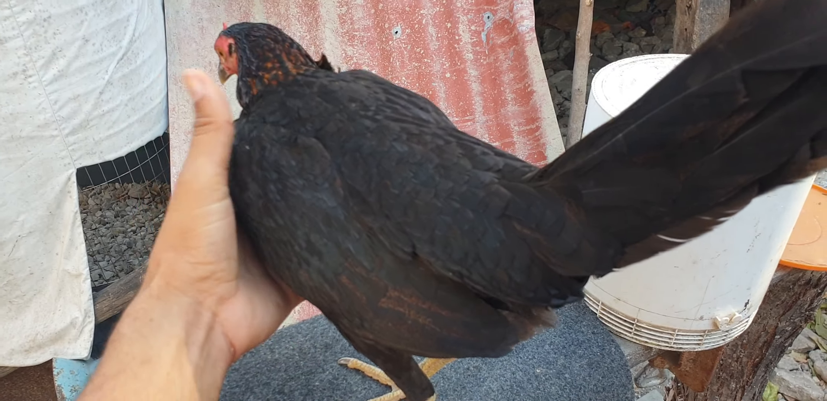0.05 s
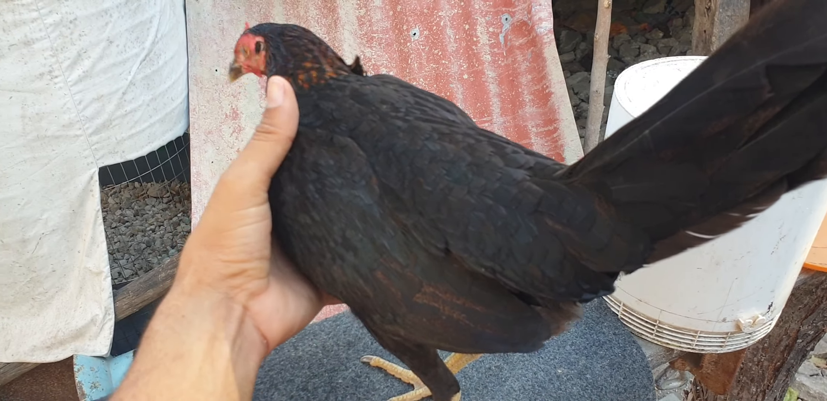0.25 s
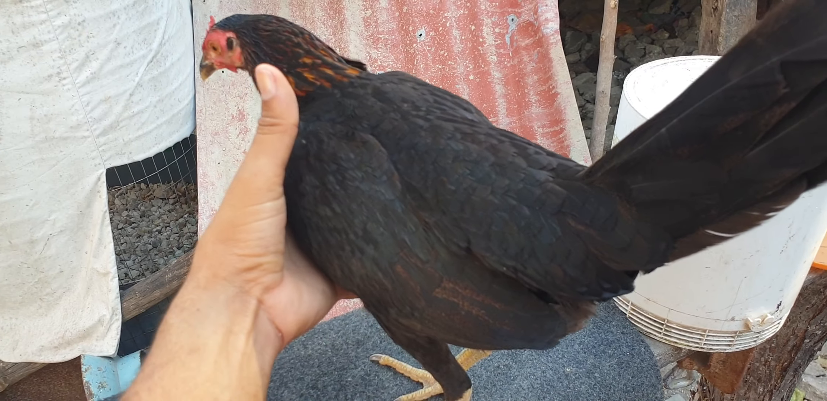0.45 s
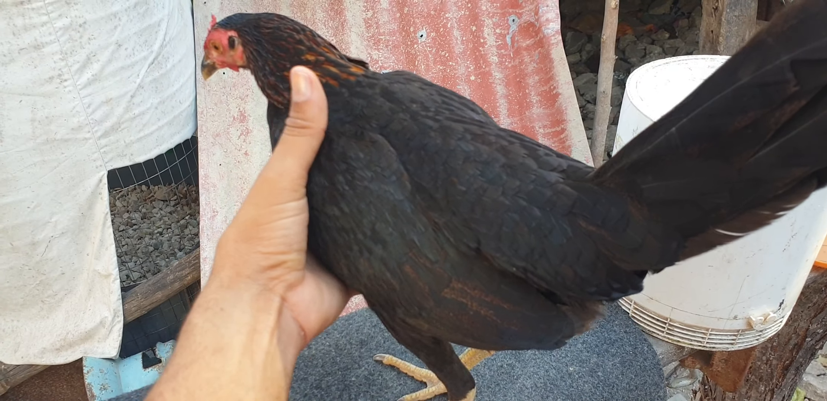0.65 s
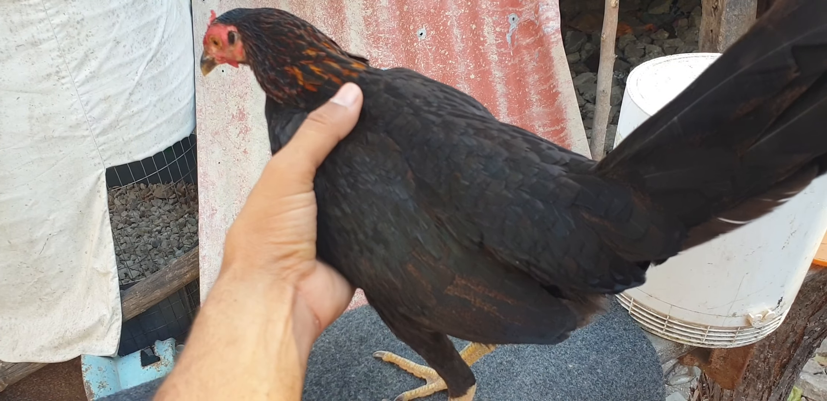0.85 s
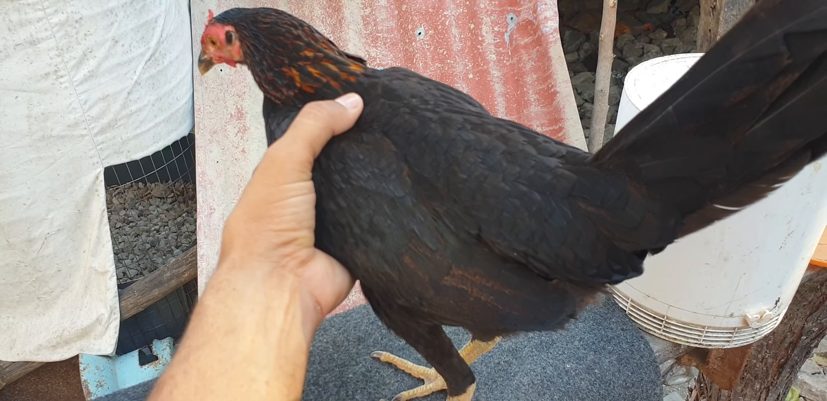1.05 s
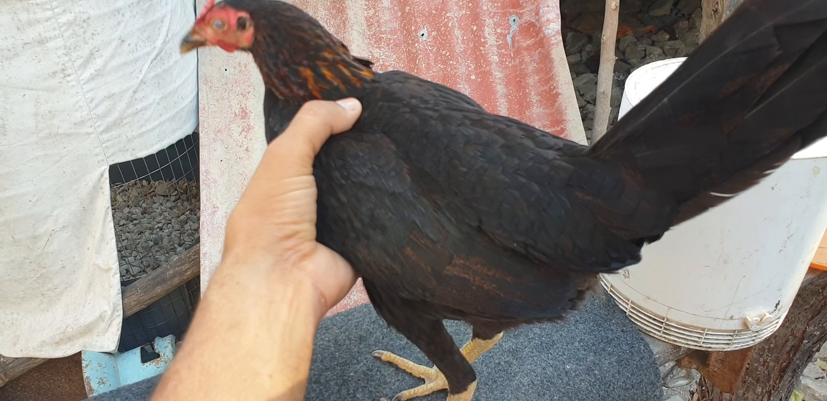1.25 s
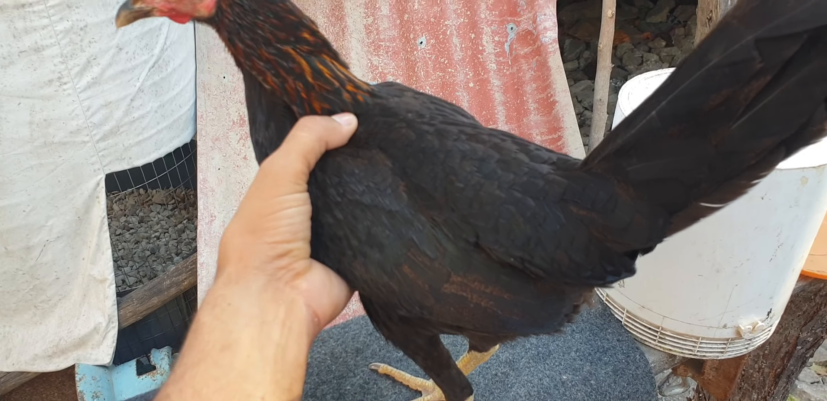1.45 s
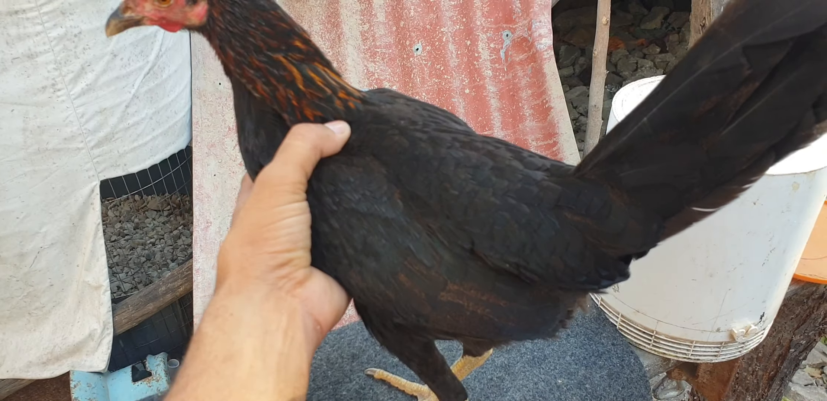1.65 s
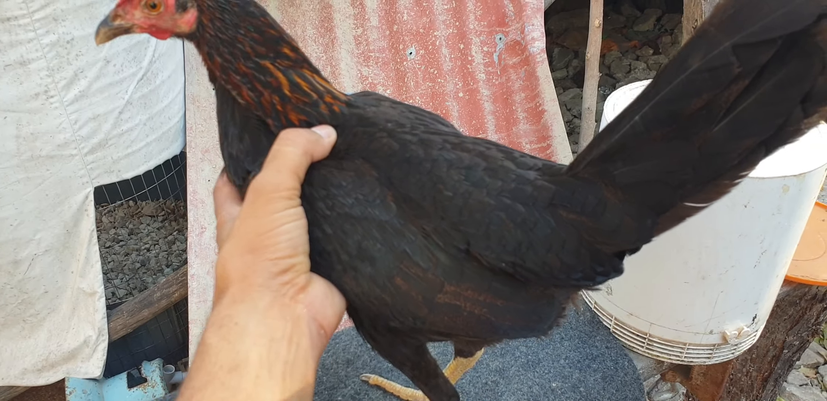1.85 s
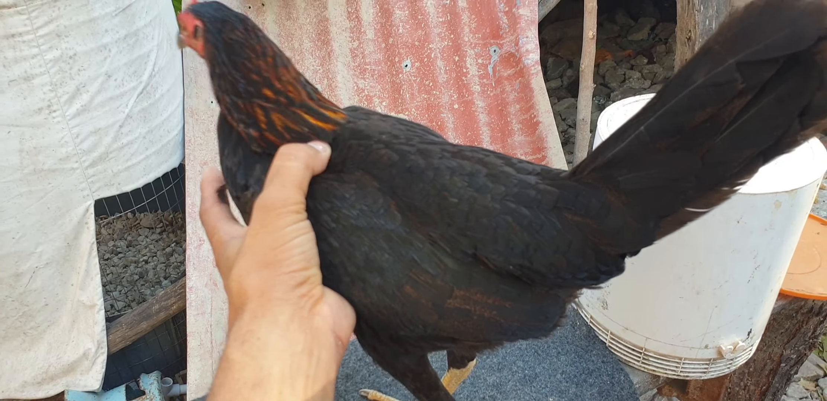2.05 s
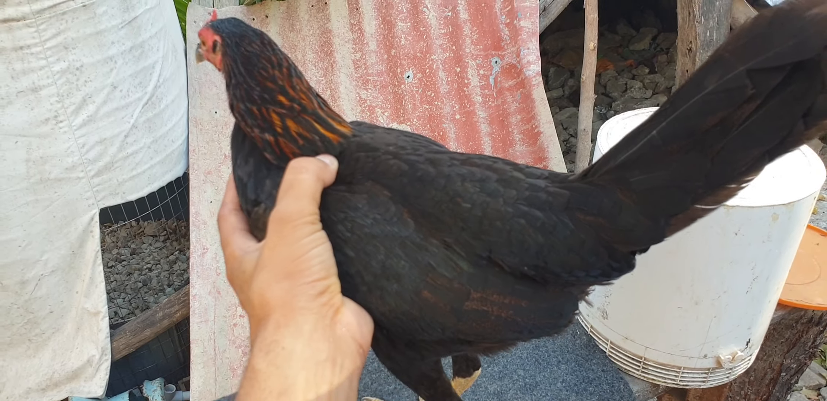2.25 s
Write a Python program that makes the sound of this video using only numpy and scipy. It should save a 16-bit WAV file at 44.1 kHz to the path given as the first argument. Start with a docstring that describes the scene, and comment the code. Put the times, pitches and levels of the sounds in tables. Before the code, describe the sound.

A hen calls close to the microphone in four drawn-out notes, flipping between a clear tone and a hoarse rattle. Three run from 0.2 to 1 second, with thin wheezes and a soft hand bump near 0.6. The fourth starts at 1.2 and cracks into a croak around 1.55. From 1.8 to 2.4 seconds come faint clucks and a light feather rustle, over quiet yard noise.

```python
"""A quiet yard, where a hen, held and stroked close to the microphone, complains in four drawn-out notes.
Her voice flips between a clean tone near 1 kHz and a hoarse rattle of membranes slapping in her throat.
A thin wheeze of air slips between the notes, and the last one cracks into a croak.
The hand adds a soft bump, faint clucks and a feather rustle trail off, and the yard gives a short echo."""
import sys
import numpy as np
from scipy import signal
from scipy.fft import rfft, irfft
from scipy.io import wavfile
from scipy.ndimage import uniform_filter1d

SR = 44100
rng = np.random.default_rng(int(sys.argv[2]) if len(sys.argv) > 2 else 0)


def put_to_file(sound):
    """Save the sound as 16-bit audio at rate SR, in the file named by the first command-line argument."""
    columns = np.atleast_2d(sound).T  # one column per channel
    safe = np.clip(columns, -1, 1)
    whole_steps = np.round(safe * 32767)
    wavfile.write(sys.argv[1], SR, whole_steps.astype(np.int16))


N = 105840
T = np.arange(N) / SR

# colour of the outdoor bed (frequency [Hz], gain [dB])
YARD_EQ = [(25, -20.5), (65, -5.5), (125, -13.5), (210, -15.5), (255, -10), (320, -20), (460, -9.5),
           (600, -20), (950, -21), (1400, -31), (2200, -26.5), (4000, -46), (6200, -40), (8200, -56),
           (15000, -47.5)]
# its slow swell (time [s], level [dB])
YARD_LEVEL = [(0, -63.5), (1.3, -57.5), (2.0, -59.5), (2.4, -62.5)]
# envelope of the hoarse voice (time [s], level [dB])
RASP_LEVEL = [(.18, -81), (.188, -36.5), (.207, -31.5), (.24, -28.5), (.262, -38), (.31, -50.5),
              (.332, -30.5), (.37, -32.5), (.398, -27), (.43, -35.5), (.48, -50.5), (.505, -27),
              (.522, -31.5), (.545, -53), (.602, -59), (.622, -28.5), (.655, -33), (.68, -30), (.75, -33),
              (.78, -48), (.806, -54), (.822, -32), (.86, -32.5), (.892, -40), (.945, -28), (1.0, -26),
              (1.045, -37.5), (1.085, -59), (1.13, -61), (1.175, -30), (1.228, -27.5), (1.255, -41.5),
              (1.34, -59.5), (1.54, -45)]
# throat resonances (frequency [Hz], width [Hz], gain [dB])
THROAT = [(464, 180, -23.5), (791.6, 175, 5), (1137, 583, -3), (2080, 563, 6), (2332, 510, 5),
          (2757, 300, 0.5), (3505, 430, -4.5), (3923, 500, -5), (5050, 650, -12), (6352, 510, -11.5),
          (11600, 6000, -40)]
# one envelope table per note (time [s], fundamental [dB], second harmonic [dB], overtones [dB])
NOTES = [
    [(.2, -33, -34, -40), (.22, -27.5, -30, -37), (.255, -26, -19.5, -36.5), (.32, -23.5, -18, -33.5),
     (.343, -31.5, -29.5, -35), (.37, -22.5, -19.5, -30), (.405, -37.5, -43.5, -45)],
    [(.5, -34, -36, -37), (.528, -28, -17.5, -30.5), (.555, -43.5, -26, -28), (.585, -34.5, -22, -30.5),
     (.612, -26.5, -21, -30.5), (.64, -37, -36, -45)],
    [(.665, -35, -35, -41.5), (.72, -27, -24.5, -31), (.78, -26, -24, -30), (.817, -30, -17, -29),
     (.832, -29, -28.5, -33.5), (.89, -26, -21.5, -30.5), (.955, -28.5, -28, -34), (1.0, -56.5, -30.5, -46)],
    [(1.185, -35, -26.5, -56.5), (1.26, -27.5, -26, -42), (1.345, -31.5, -18, -39.5),
     (1.392, -38.5, -24, -47), (1.415, -39, -17.5, -39.5), (1.455, -37, -23, -43), (1.521, -37.5, -21, -39),
     (1.545, -32, -75, -36.5)],
]
# melody of the call (time [s], pitch [Hz])
PITCH = [(.2, 974), (.25, 994.3), (.335, 1001), (.39, 978.7), (.5, 993), (.55, 1026), (.59, 1018),
         (.63, 984), (.81, 1011), (.97, 993.2), (1.2, 991.6), (1.32, 973.4), (1.45, 944), (1.54, 927.6)]
# overtones from the third harmonic up, for three beak positions (level [dB])
BEAK_OPENING = [-9.5, -9.5, -27.5, -20.5, -33.5, -65, -40.5, -36, -41.5, -41, -31.5, -43, -44]
BEAK_OPEN = [-10.5, -9, -17.5, -23.5, -33.5, -40.5, -45, -43, -42.5, -52.5, -45, -47, -48.5]
BEAK_HALF_SHUT = [-14, -23.5, -23, -45.5, -28, -40.5, -52, -52, -36, -31.5, -46, -42.5, -58]
# half-harmonics as the last note splits into strong and weak cycles (time [s], level [dB])
SPLIT_LEVEL = [(1.45, -92.5), (1.49, -54.5), (1.54, -29.5)]
# breaths between notes (start [s], length [s], level [dB])
WHEEZES = [(0.398, 0.093, -34.5), (0.486, 0.021, -30.5), (0.988, 0.14, -39), (1.11, .12, -30)]
# their whistling colour (frequency [Hz], gain [dB])
WHEEZE_EQ = [(900, -35), (1700, -13.5), (2020, 1.5), (2450, -0.5), (2900, -17), (6200, -32.5), (7600, -61)]
# hand bump (start [s], level [dB], bandwidth [Hz], decay [s])
BUMPS = [(.605, -37.5, 243, 0.0042)]
# envelope of the croak (time [s], level [dB])
CROAK_LEVEL = [(1.526, -50), (1.546, -25), (1.563, -29.5), (1.57, -43), (1.605, -43)]
# its dull ending on the second harmonic (start [s], length [s], level [dB])
CROAK_END = (1.547, 0.039, -31)
# throat colour of the cracking voice (frequency [Hz], gain [dB])
CROAK_EQ = [(450, -13), (1500, 0.5), (1850, -1), (2600, 5), (3100, -22), (3600, -10), (4000, -32),
            (6900, -20), (7800, -44), (11000, -31), (15000, -33)]
# faint clucks (start [s], length [s], level [dB], pitch [Hz])
CLUCKS = [(1.843, 0.073, -57.5, 494), (2.034, 0.084, -51.5, 514), (2.08, 0.078, -52.5, 512),
          (2.216, 0.082, -51.5, 499)]
# their first three harmonics (level [dB])
CLUCK_HARMONICS = [-11.5, 3.5, -11.5]
# strokes of the hand (start [s], length [s], level [dB])
STROKES = [(2.04, 0.18, -68), (2.212, 0.17, -63.5)]
# colour of the feathers (frequency [Hz], gain [dB])
FEATHER_EQ = [(1000, 4), (2500, -6.5), (4000, -3.5), (6200, 5), (8300, -13), (10500, -0.5), (15000, -15.5)]
# echo decay (frequency [Hz], time to fall 60 dB [s])
ECHO_T60 = [(300, 0.45), (900, 0.67), (2000, 0.3), (5000, 0.29), (12000, 0.25)]
# bright echo send (frequency [Hz], gain [dB])
ECHO_EQ = [(700, -1.5), (1900, 1), (3000, 10.5)]
# muffling of the left microphone (frequency [Hz], gain [dB])
LEFT_EQ = [(750, -8), (1000, -8), (1300, -10.5), (2000, -18), (2500, -15.5), (3950, -11), (4600, -31),
           (6300, -39), (9000, -31), (15000, -13.5)]
# reflections off nearby surfaces, left then right (delay [s], level [dB])
BOUNCES = [
    [(.0043, -24), (.0117, -10)],
    [(.0071, -25), (.0163, -19.5)],
]


def amp(db):
    """Decibels to gain."""
    return 10 ** (np.asarray(db) / 20)


def unit(x):
    """Scales to rms 1."""
    return x / np.sqrt(np.mean(x ** 2) + 1e-20)


def read(points, hz):
    """Reads a spectrum on a log-frequency axis."""
    f, value = np.transpose(points)
    return np.interp(np.log(hz + 1), np.log(f + 1), value)


def gate(times, fade_s=.016):
    """Fades in from the first time and out to the last."""
    return np.clip(np.minimum(T - times[0], times[-1] - T) / fade_s, 0, 1)


def level(points):
    """Gain from a (time [s], level [dB]) envelope, faded at both ends."""
    s, db = np.transpose(points)
    return amp(np.interp(T, s, db)) * gate(s)


def colour(x, points):
    """Applies a (frequency [Hz], gain [dB]) EQ curve."""
    return irfft(rfft(x, 2 * N) * amp(read(points, np.fft.rfftfreq(2 * N, 1 / SR))))[:N]


def wander(hz):
    """Random motion up to a rate."""
    f = np.fft.rfftfreq(N, 1 / SR)
    return unit(irfft(rfft(rng.standard_normal(N)) / (1 + (f / hz) ** 4), N))


def arch(start, length, skew=1):
    """A smooth swell; skew under 1 peaks early."""
    return np.sin(np.pi * np.clip((T - start) / length, 0, 1) ** skew)


def delayed(x, s):
    """Shifts a sound later by s seconds."""
    return np.interp(T - s, T, x)


def resonate(x, hz, width, order=3):
    """A steep resonance that follows the curve hz."""
    turn = np.exp(2j * np.pi * np.cumsum(hz) / SR)
    pole = np.exp(-np.pi * width / SR)
    z = x / turn
    for _ in range(order):
        z = signal.lfilter([1 - pole], [1, -pole], z)
    return 2 * (turn * z).real


def yard(correlation=.58, left_db=-7.5):
    """A low bed of outdoor noise, partly shared by both sides."""
    right, spread = (unit(colour(rng.standard_normal(N), YARD_EQ)) for _ in range(2))
    left = amp(left_db) * (correlation * right + np.sqrt(1 - correlation ** 2) * spread)
    return np.array([left, right]) * amp(np.interp(T, *np.transpose(YARD_LEVEL)))


def rattle(slaps_per_s=480, scatter=.25, air_mix=.5, puff_s=.00098):
    """Uneven slaps of the membranes, each with a puff of air."""
    cycles = np.cumsum(slaps_per_s * np.exp(scatter * wander(slaps_per_s))) / SR
    slaps = np.diff(np.floor(cycles), prepend=0) * np.exp(.21 * rng.standard_normal(N))
    puffs = signal.lfilter([1], [1, -np.exp(-1 / (puff_s * SR))], slaps) * rng.standard_normal(N)
    return (1 - air_mix) * unit(slaps) + air_mix * unit(puffs)


def rasp(sway=.016, sway_hz=30.2, shut_s=1.1, shut_db=-4.5, leveller_hz=120):
    """The rattle rings the swaying throat resonances, levelled so it never crackles."""
    drive, out = rattle(), np.zeros(N)
    for hz, width, db in THROAT:
        dulled = (T > shut_s) * (3700 < hz < 7000)  # the beak half shuts for the last note
        out += amp(db + shut_db * dulled) * resonate(drive, hz * (1 + sway * wander(sway_hz)), width)
    envelope = np.sqrt(abs(uniform_filter1d(unit(out) ** 2, int(SR / leveller_hz))) + 1e-9)
    return level(RASP_LEVEL) * unit(out / envelope)


def clean_tone(jitter=.0025, rough_jitter=.0079, flutter=.52, flutter_hz=139, shimmer_db=2.5):
    """The clean voice: its overtones shimmer, and it shakes as the rattle takes over or its cycles split."""
    hoarse, split = level(RASP_LEVEL), level(SPLIT_LEVEL)
    rough = hoarse / hoarse.max() + .5 * split / split.max()
    hz = np.interp(T, *np.transpose(PITCH)) * (1 + (jitter + rough_jitter * rough) * wander(flutter_hz))
    phase = 2 * np.pi * np.cumsum(hz) / SR
    partials = [np.cos(k * phase + 2 * np.pi * rng.random()) * amp(shimmer_db * wander(hz=30))
                for k in np.arange(len(BEAK_OPEN)) + 3]
    out = np.zeros(N)
    for note, beak in zip(NOTES, (BEAK_OPENING, BEAK_OPEN, BEAK_OPEN, BEAK_HALF_SHUT)):
        times, *dbs = np.transpose(note)
        first, second, upper = (amp(np.interp(T, times, db)) for db in dbs)
        body = first * unit(np.cos(phase)) + second * unit(np.sin(2 * phase))
        overtones = unit(amp(beak) @ partials)
        out += gate(times) * (body + upper * overtones)
    out *= 1 + flutter * rough * wander(flutter_hz)
    half_harmonics = sum(np.cos((k + .5) * phase) for k in range(len(BEAK_OPEN)))
    return out + split * unit(colour(half_harmonics, CROAK_EQ))


def wheeze():
    """Air whistles through the hen's throat between notes."""
    air = unit(colour(rng.standard_normal(N), WHEEZE_EQ))
    return air * sum(amp(db) * arch(s, length) for s, length, db in WHEEZES)


def hand_bump(attack_s=.0021):
    """The hand lands with a soft, dull thud of low noise."""
    out = np.zeros(N)
    for s, db, hz, decay in BUMPS:
        age = np.maximum(T - s, 0)
        out += amp(db) * np.minimum(age / attack_s, 1) * np.exp(-age / decay) * wander(hz)
    return out


def croak(start_hz=480, sag_hz_per_s=2500, jitter=.07, shimmer_db=4):
    """The last note cracks an octave down into uneven cycles that sink and turn dull."""
    start, end = CROAK_LEVEL[0][0], CROAK_LEVEL[-1][0]
    hz = start_hz - sag_hz_per_s * (np.clip(T, start, end) - start)
    phase = 2 * np.pi * np.cumsum(hz * (1 + jitter * wander(start_hz))) / SR
    shimmer = amp(shimmer_db * wander(start_hz / 2))
    buzz = sum(np.cos(k * phase + 2 * np.pi * rng.random()) for k in range(1, 33))
    voice = colour(shimmer * buzz, CROAK_EQ)
    voice /= voice[(T > start) & (T < end)].std()
    s, length, db = CROAK_END
    dull_ending = amp(db) * arch(s, length) * unit(shimmer * np.sin(2 * phase))
    return level(CROAK_LEVEL) * voice + dull_ending


def clucks(sag=.03, jitter=.01227):
    """Faint short clucks with a sagging pitch."""
    out = np.zeros(N)
    for s, length, db, hz in CLUCKS:
        progress = np.clip((T - s) / length, 0, 1)
        glide = 1 - sag * (progress - .5) + jitter * wander(hz=123)
        phase = 2 * np.pi * np.cumsum(hz * glide) / SR
        voice = sum(amp(h) * np.sin(k * phase) for k, h in enumerate(CLUCK_HARMONICS, 1))
        out += amp(db) * arch(s, length, skew=.74) * unit(voice)
    return out


def feather_rustle(grain_db=2.5):
    """The hand brushes the feathers in swells of grainy hiss."""
    grains = rng.standard_normal(N) * amp(grain_db * wander(hz=400))
    return unit(colour(grains, FEATHER_EQ)) * sum(amp(db) * arch(s, length) for s, length, db in STROKES)


def echo(x, attack_s=.01, return_db=-17, left_db=-7.5):
    """Scattered reflections from walls and sheds; the treble dies first."""
    hz, t, noise = signal.stft(rng.standard_normal((2, SR)), SR, nperseg=256)
    decay = amp(-60 * t / read(ECHO_T60, hz)[:, None])
    tail = signal.istft(noise * decay * np.minimum(t / attack_s, 1), SR, nperseg=256)[1]
    tail /= np.linalg.norm(tail[0])
    left, right = signal.fftconvolve(colour(x, ECHO_EQ)[None], tail, axes=1)[:, :N]
    left = amp(left_db) * colour(left, [(3800, -2.5), (4800, -19)])
    return amp(return_db) * np.array([left, right])


def scene():
    """The right microphone hears the hen fully; the left hears her a little earlier but muffled."""
    hen = clean_tone() + rasp() + croak() + wheeze() + clucks() + feather_rustle() + hand_bump()
    left = delayed(colour(hen, LEFT_EQ), s=-.00031)
    close = [x + sum(amp(db) * delayed(x, s) for s, db in rows) for x, rows in zip((left, hen), BOUNCES)]
    return np.array(close) + echo(hen) + yard()


def record(dry):
    """A steep high cut on the whole mix."""
    high_cut = signal.firwin(511, cutoff=15700, window=("kaiser", 9), fs=SR)
    return signal.oaconvolve(dry, high_cut[None], "same")


dry = scene()
out = record(dry)
put_to_file(out)
```